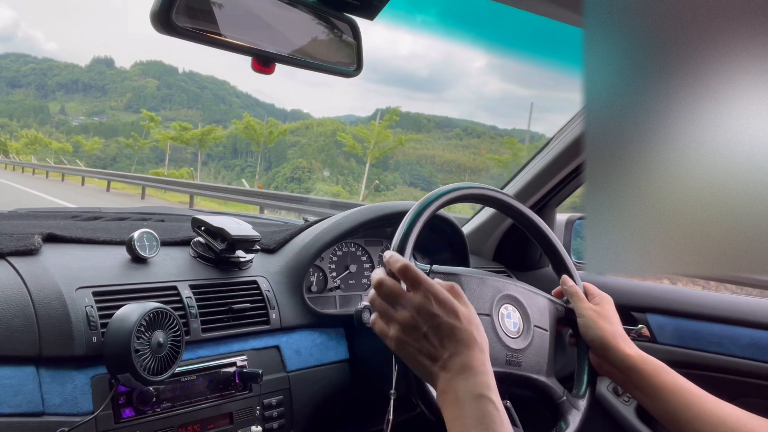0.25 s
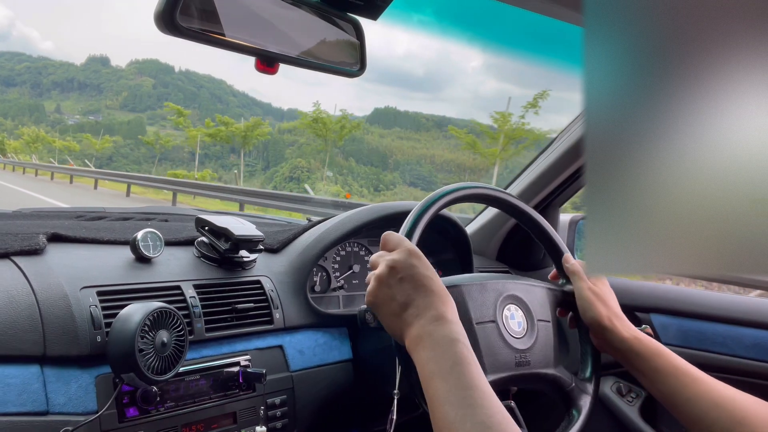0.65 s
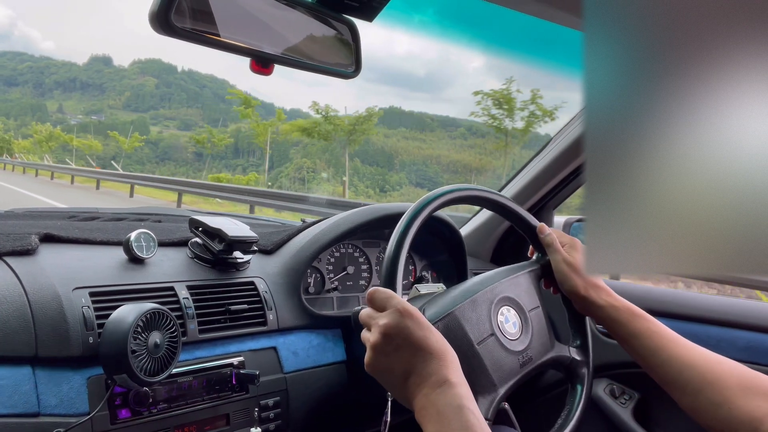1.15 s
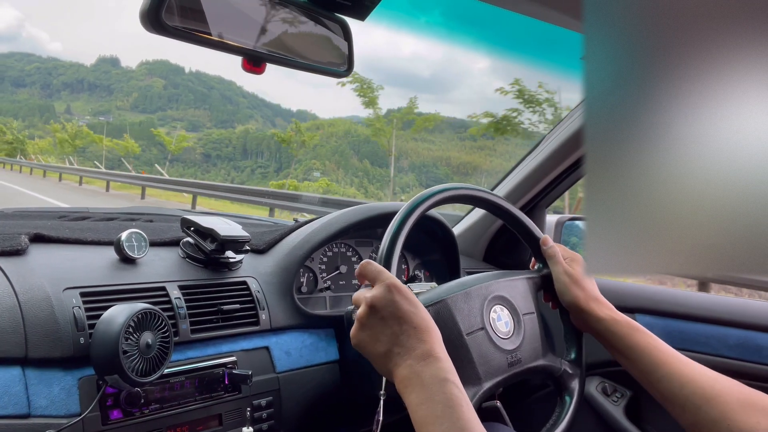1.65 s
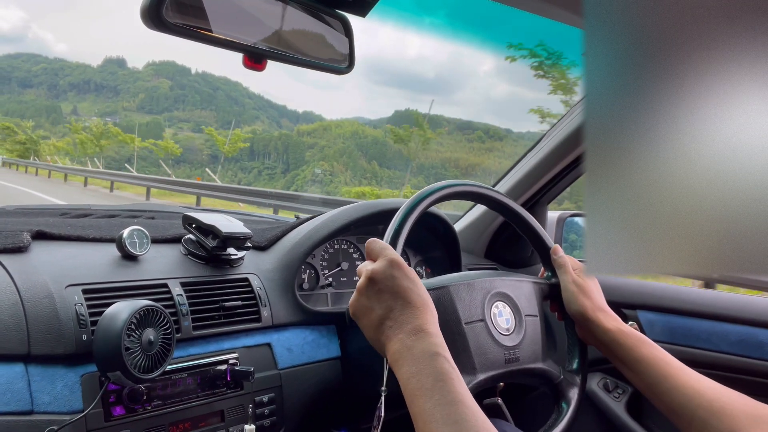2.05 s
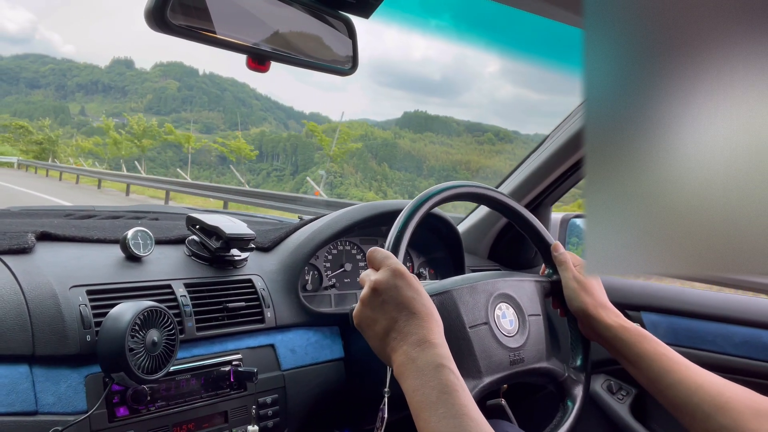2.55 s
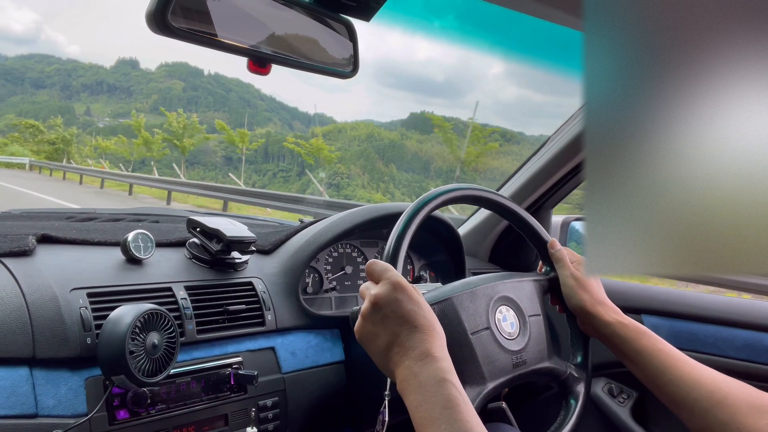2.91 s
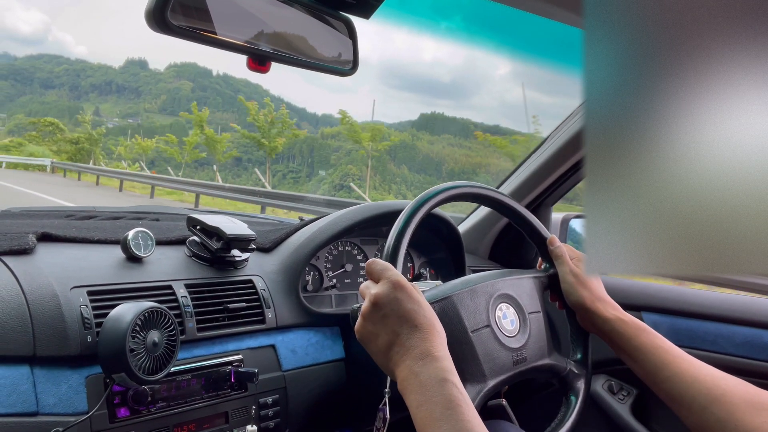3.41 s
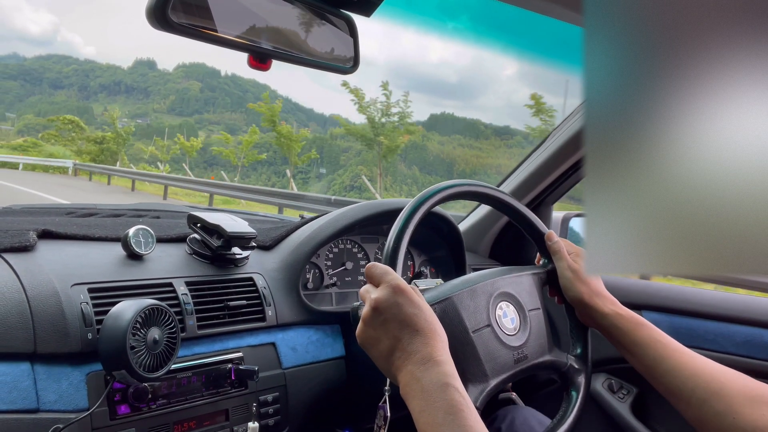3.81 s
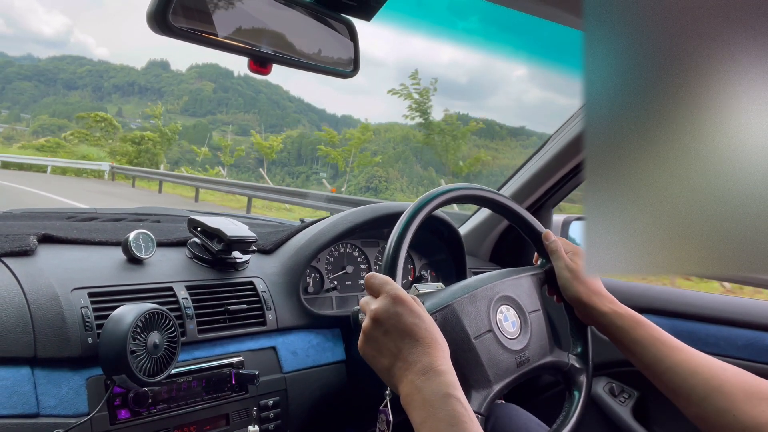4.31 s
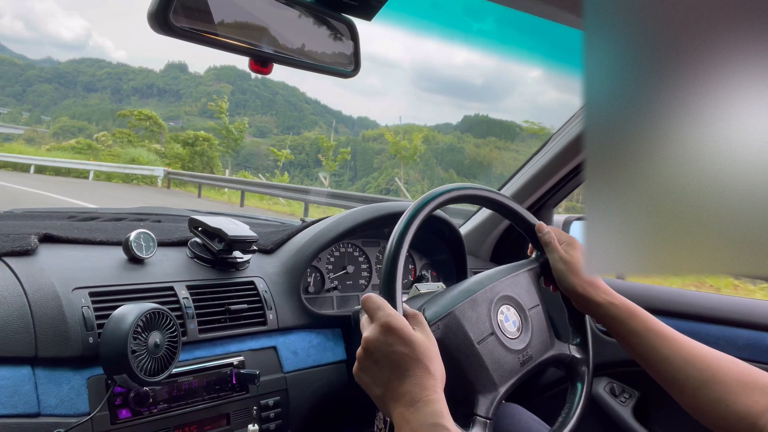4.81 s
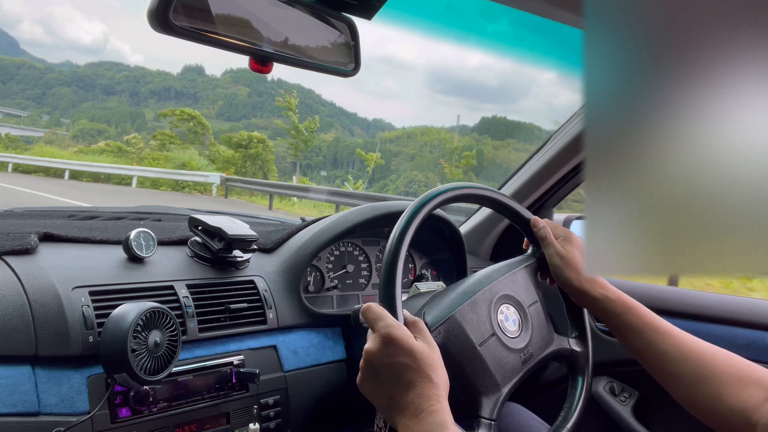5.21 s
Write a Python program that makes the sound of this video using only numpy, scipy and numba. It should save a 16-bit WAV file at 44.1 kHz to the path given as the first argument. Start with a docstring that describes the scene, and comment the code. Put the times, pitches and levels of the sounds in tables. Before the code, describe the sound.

Inside a moving car, a low engine hum rises and eases off over road roar, then wind slams the microphone in harsh, crackling buffets.

```python
"""Wind rushes in at a car window left ajar on a country road and buffets a two-port microphone, clipping its input.
Under it the engine hums up and eases off, the cabin booms and thuds, panels rumble and trim ticks.
Wind is noise low-passed at a corner set by air speed, with swept sine vortices and short overload cracks.
Engine and boom are wavering sines; tyre roar, air hiss, whines and panel rumble are shaped noise."""
import sys
import numpy as np
from scipy import signal
from scipy.fft import rfft, irfft, next_fast_len
from scipy.io import wavfile
from scipy.ndimage import uniform_filter1d
from numba import njit

SR = 44100
rng = np.random.default_rng(int(sys.argv[2]) if len(sys.argv) > 2 else 0)


def transcribe(u):
    """Save the signal u as a 16-bit wav file named by the first command-line argument.

    u: samples, shape (n,) or (channels, n), limited to [-1, 1]; the rate is SR.
    q: integer samples, one column per channel.
    """
    v = np.clip(np.atleast_2d(u).T, -1, 1)
    q = np.round(v * 32767).astype(np.int16)
    wavfile.write(sys.argv[1], SR, q)


N = 240770
T = np.arange(N) / SR
FFT_SIZE = next_fast_len(N)
BIN_HZ = np.maximum(np.arange(FFT_SIZE // 2 + 1) * SR / FFT_SIZE, 1)
SIDES = np.array([[1], [-1]])  # left, right; every pan_db is left minus right, every lead_rad is left ahead


def undb(db):
    """dB to gain."""
    return 10 ** (np.asarray(db) / 20)


def unit(x):
    """Scale to rms 1."""
    return x / np.sqrt(np.mean(x ** 2))


def curves(table):
    """Columns of a time table, interpolated to one value a sample."""
    s, *columns = np.transpose(table)
    return [np.interp(T, s, c) for c in columns]


def along(table, column=1):
    """A column of a frequency table on the transform bins, interpolated in log frequency."""
    table = np.array(table, float)
    return np.interp(np.log(BIN_HZ), np.log(table[:, 0]), table[:, column])


def walk(rate_hz):
    """Random levels held 1 / rate_hz and slewed twice; rms 1."""
    hold = int(SR / rate_hz)
    steps = np.repeat(rng.standard_normal(N // hold + 1), hold)
    return unit(uniform_filter1d(uniform_filter1d(steps, hold), hold)[:N])


def pair(likeness, lead_rad, pan_db=0):
    """Spectra of left and right noise, partly shared; the shared part is turned in phase between the ports."""
    shared, left, right = rfft(rng.standard_normal((3, FFT_SIZE)))
    turned = np.sqrt(likeness) * shared * np.exp(.5j * lead_rad * SIDES)
    both = turned + np.sqrt(1 - likeness) * np.array([left, right])
    return both * undb(pan_db * SIDES / 2)


def ring(hz, width_hz, pan_db, likeness):
    """Noise ringing one resonance; rms 1."""
    response = 1 / (1 + ((BIN_HZ - hz ** 2 / BIN_HZ) / width_hz) ** 2)
    return unit(irfft(pair(likeness, 0, pan_db) * response, FFT_SIZE)[:, :N])


@njit
def lowpass(x, hz, damp):
    """State-variable low-pass whose corner moves every sample."""
    y, band, low = np.empty(len(x)), 0., 0.
    for i in range(len(x)):
        g = np.tan(np.pi * hz[i] / SR)
        v = (band + g * (x[i] - low)) / (1 + g * (g + damp))
        y[i] = low + g * v
        band, low = 2 * v - band, low + 2 * g * v
    return y


# Each row: time in seconds, firing rate in Hz, firing tone in dB, its octave in dB.
ENGINE_CURVE = [(0, 71.2, -13, -24), (.2, 71.85, -12.5, -21.5), (.4, 73.85, -17, -20.5),
                (.6, 75.92, -16.5, -25.5), (.8, 78.04, -14, -26), (1.1, 79.9, -12.5, -25.5),
                (1.24, 79.83, -15.5, -27.5), (1.35, 78.08, -24, -27), (1.55, 74.95, -19, -29.5),
                (1.7, 74.13, -23.5, -35), (2.0, 69.9, -16.5, -34)]
# Weaker orders. Each row: multiple of firing rate, dB relative to the octave at 0 s, gain in dB per second.
ENGINE_ORDERS = [(2.5, -15, 3), (3, -24, 12), (3.5, -23, 5), (4, -23, 2)]
ENGINE_PAN_DB, ENGINE_LEAD_RAD = -3, 0.87


def engine():
    """Firing tone and overtones; combustion varies a little, and the hum is gone once the throttle closes."""
    hz, firing_db, octave_db = curves(ENGINE_CURVE)
    phase = 2 * np.pi * np.cumsum(hz * (1 + 0.0024 * walk(25))) / SR
    tones = [(1, firing_db, ENGINE_LEAD_RAD), (2, octave_db, 0)]
    for multiple, db, gain_db in ENGINE_ORDERS:
        tones.append((multiple, octave_db + db + gain_db * T + 4.4 * walk(9), 0))
    hum = 0
    for multiple, db, lead_rad in tones:
        level = np.sqrt(2) * undb(db + 1.1 * walk(9))
        hum = hum + level * np.sin(multiple * phase + lead_rad * SIDES / 2)
    fade = np.clip((ENGINE_CURVE[-1][0] - T) / 0.02, 0, 1)
    return hum * undb(ENGINE_PAN_DB * SIDES / 2) * fade


# Lowest cabin mode. Each row: time in seconds, frequency in Hz, steady level in dB before boom gain.
BOOM_CURVE = [(0, 53.63, -16), (.35, 53.9, -14.5), (.9, 53.84, -24.5), (1.35, 51.92, -15.5),
              (1.6, 52.98, -17.5), (1.85, 55.6, -23.5), (2.3, 57.32, -14), (3.1, 55.98, -16),
              (3.4, 60.96, -26), (3.9, 56.8, -31), (4.3, 54.25, -27.5), (4.72, 53.34, -15),
              (4.88, 54.8, -22), (5.02, 55.02, -19.5), (5.46, 51, -20)]
# The boom swells and sinks. Each row: time of the top in seconds, top level in dB before boom gain,
# length in seconds.
BOOM_SWELLS = [(0.566, -14.5, 0.15), (0.703, -15.5, 0.11), (0.814, -9.5, 0.037), (1.044, -15, 0.085),
               (1.26, -14, 0.094), (1.967, -17, 0.11), (2.07, -9.5, 0.055), (2.474, -13, 0.18),
               (2.632, -14.5, 0.096), (2.774, -12, 0.17), (2.989, -12.5, 0.15), (4.279, -19, 0.05),
               (4.425, -14.5, 0.16), (4.61, -18.5, 0.2), (5.175, -14, 0.17), (5.346, -14.5, 0.071)]
# Body panels. Each row: time in seconds, rumble level in dB.
PANEL_LEVELS = [(0, -22.5), (.4, -27.5), (1.0, -20.5), (1.7, -23.5), (1.95, -14.5), (2.4, -19.5),
                (2.75, -28), (3.0, -14.5), (3.27, -11), (3.5, -17.5), (3.72, -21), (4.4, -30),
                (4.77, -19.5), (5.0, -28), (5.46, -22.5)]
BOOM_GAIN_DB, BOOM_PAN_DB = 0.4, 4.5
SWELL_GAP_DB, SWELL_GAP_S = -8, 0.015  # the steady boom gives way around a swell


def cabin():
    """Road-shaken cabin air swings on its lowest mode, wavering, with a looser rumble; panels ring higher."""
    hz, steady_db = curves(BOOM_CURVE)
    s, top_db, length_s = np.transpose(BOOM_SWELLS)[:, :, None]
    away = abs(T - s) / (length_s / 2)
    swell = np.sum(undb(top_db) * np.cos(np.pi / 2 * np.clip(away, 0, 1)), axis=0)
    outside_s = (away - 1).clip(0) * length_s / 2
    near = np.max(np.exp(-(outside_s / SWELL_GAP_S) ** 2), axis=0)
    size = swell + undb(steady_db + SWELL_GAP_DB * near + 2.6 * walk(10))
    wavering_hz = hz * (1 + 0.02844 * walk(18) + 0.02983 * walk(4))
    phase = 2 * np.pi * np.cumsum(wavering_hz) / SR + 0.23 * walk(6.8) * SIDES / 2
    boom = np.sqrt(2) * size * undb(BOOM_GAIN_DB + BOOM_PAN_DB * SIDES / 2) * np.sin(phase)
    rumble = size * undb(-5) * ring(hz=34, width_hz=41, pan_db=0.99, likeness=0.91)
    panels = undb(curves(PANEL_LEVELS)[0]) * ring(hz=87.5, width_hz=53.5, pan_db=-2, likeness=0.43)
    return boom + rumble + panels


# Path difference turns the treble phase between the ports.
# Each row: frequency in Hz, likeness 0-1, left lead in radians, left minus right in dB.
PORT_RESPONSE = [(154, 0.02, 1.5, -1.5), (324, 0.42, -0.1, -2), (680, 0.63, 4, -3), (1610, 0.22, 0, -0.3),
                 (2850, 0.05, 0.5, -2), (4700, 0.04, -6, -1), (7850, 0.5, -4, -1), (11000, 0.6, -1, -1),
                 (14100, .9, 2.5, 0), (15800, .8, 4, 3.5)]


def rush(spectrum, in_hz, swell_db, flicker_db):
    """Noise octave bands that swell together and flicker alone; rms 1 within in_hz before both."""
    ports = pair(along(PORT_RESPONSE), along(PORT_RESPONSE, column=2), along(PORT_RESPONSE, column=3))
    noise = undb(along(spectrum)) * ports
    inside = (BIN_HZ > in_hz[0]) & (BIN_HZ < in_hz[1])
    noise /= np.sqrt(2 * np.mean(np.sum(abs(noise[:, inside]) ** 2, axis=1))) / FFT_SIZE
    out = 0
    for octave in np.arange(np.log2(spectrum[0][0]), np.log2(spectrum[-1][0]) + 1):
        band = np.clip(1 - abs(np.log2(BIN_HZ) - octave), 0, 1)
        out = out + undb(flicker_db * walk(24)) * irfft(band * noise, FFT_SIZE)[:, :N]
    return undb(swell_db * walk(5.05)) * out


# Each row: time in seconds, tyre roar in dB within 1.5-3 kHz, air hiss in dB within 6-12 kHz.
ROAD_LEVELS = [(0, -51.5, -61), (.5, -50.5, -58.5), (1.0, -49.5, -57.5), (1.5, -50, -59),
               (1.9, -49.5, -60.5), (2.2, -48.5, -65), (3.3, -49, -62), (4.0, -50, -63.5),
               (4.5, -50.5, -65.5), (5.0, -49.5, -68), (5.46, -51, -70)]
# Each row: frequency in Hz, relative density in dB per Hz.
TYRE_SPECTRUM = [(80, -36.5), (130, 0.5), (250, -7.5), (400, -14.5), (520, -19), (640, -13), (800, -21),
                 (1000, -21.5), (1130, -25), (1280, -33), (1500, -31.5), (1900, -32), (2600, -36.5),
                 (3000, -43.5), (3500, -49), (4800, -50), (7000, -84.5)]


def tyres():
    """Tyre roar: broad noise weighted to the low end."""
    tyre_db, _ = curves(ROAD_LEVELS)
    return undb(tyre_db) * rush(TYRE_SPECTRUM, (1500, 3000), swell_db=.7, flicker_db=.8)


# Each row: frequency in Hz, relative density in dB per Hz.
HISS_SPECTRUM = [(2500, -3.5), (3500, 3), (4200, -1), (5000, -4), (6800, -4), (8400, -7), (10200, -1.5),
                 (12000, -10.5), (13800, -15), (15300, -9), (16500, -17)]


def hiss():
    """Air hissing past: treble noise."""
    _, hiss_db = curves(ROAD_LEVELS)
    return undb(hiss_db) * rush(HISS_SPECTRUM, (6000, 12000), swell_db=1.1, flicker_db=.8)


# Dashboard resonances. Each row: frequency in Hz, width in Hz, left minus right in dB.
WHINE_MODES = [(3472, 28, -5), (1815, 24, 0)]
# Each row: time in seconds, first whine in dB, second whine in dB.
WHINE_CURVE = [(0, -70, -68), (.2, -68, -68), (.45, -62.5, -66), (.56, -71, -68), (.8, -65, -57.5),
               (.95, -69, -60), (1.1, -66, -61), (1.25, -66, -56.5), (1.45, -71, -64), (1.7, -66, -62),
               (1.9, -72, -66), (2.1, -90, -90)]


def whines():
    """Faint, narrow, unsteady dashboard tones: noise ringing resonances."""
    out = 0
    for (hz, width_hz, pan_db), db in zip(WHINE_MODES, curves(WHINE_CURVE)):
        out = out + undb(db) * ring(hz, width_hz, pan_db, likeness=0.56)
    return out


WIND_LIKENESS, WIND_LEAD_RAD = 0.79, 1.886


def eddies(hz):
    """Turbulent pressure: strong up to a corner set by the air speed, falling steeply above."""
    highpass = BIN_HZ ** 2 / (BIN_HZ ** 2 + 60 ** 2)
    raw = irfft(pair(WIND_LIKENESS, WIND_LEAD_RAD) * highpass, FFT_SIZE)[:, :N]
    dark = np.array([lowpass(lowpass(side, hz, 1.134), 1.235 * hz, 1.23) for side in raw])
    return dark * np.sqrt(SR / 2 / hz)  # holds the level as the corner moves


# Stream over the ports. Each row: time in seconds, level in dB, air speed as a share of the usual.
GUST_CURVE = [(0, -31, 1.03), (.6, -26, 1.09), (1.2, -24.5, 0.95), (1.895, -26, 1.125), (1.94, -13, 0.91),
              (2.0, -23, 0.95), (2.13, -18.5, 0.8), (2.25, -23, 0.9), (3.06, -24.5, 1.05),
              (3.1, -11.5, 0.93), (3.3, -12, 0.91), (3.4, -27, 1.4), (3.7, -34.5, 0.94),
              (4.28, -34.5, 1.21), (4.35, -56, 1.05), (4.68, -28.5, 1.15), (4.74, -23.5, 1.04),
              (5.03, -29, 1.42), (5.1, -16, 0.81), (5.2, -18.5, 0.76), (5.33, -20, 0.74), (5.46, -19, 0.8)]
# Each row: start in seconds, drive in dB before onset and buffet gain, air speed as a share of the usual
# before slowing, decay t60 in seconds.
BUFFET_HITS = [(1.908, -8, 0.6, 0.1), (1.941, -6.5, 0.86, 0.043), (2.059, -28, 1.1, 0.17),
               (2.099, -12.5, 0.73, 0.045), (2.141, -10.5, 0.68, 0.075), (2.439, -27, 0.68, 0.078),
               (2.506, -35, 1.6, 0.058), (2.881, -19, 0.64, 0.082), (3.088, -2, 0.84, 0.07),
               (3.1, -3.5, 1.03, 0.035), (3.115, -4, 0.99, 0.05), (3.135, -0.5, 1.23, 0.031),
               (3.171, -2.5, 1.31, 0.041), (3.19, -3.5, 0.96, 0.042), (3.22, -14, 0.89, 0.064),
               (3.247, -7, 1.23, 0.12), (3.263, -5, 1.47, 0.18), (3.315, -4.5, 0.96, 0.08),
               (3.348, -8, 0.7, 0.07), (3.386, -5, 0.81, 0.05), (3.422, -11, 1.05, 0.082),
               (3.439, -9, 1.28, 0.064), (3.462, -17, 1.3, 0.068), (3.509, -10, 1.38, 0.072),
               (3.534, -6.5, 1.33, 0.044), (3.57, -23, 1.1, 0.091), (3.589, -16, 1.2, 0.14),
               (3.629, -13.5, 1.46, 0.086), (3.677, -16.5, 1.42, 0.086), (3.725, -30, 1.3, 0.068),
               (3.775, -19, 1.18, 0.13), (3.785, -13.5, 1.06, 0.056), (3.882, -3.5, 1.4, 0.034),
               (3.915, -14, 0.87, 0.087), (3.935, -8.5, 1.05, 0.036), (3.961, -8.5, 1.36, 0.053),
               (3.976, -0.5, 0.74, 0.026), (4.027, -20, 1.37, 0.094), (4.064, -12, 1.28, 0.064),
               (4.136, -15.5, 0.62, 0.087), (4.166, -22, 1.2, 0.044), (4.236, -18, 1.06, 0.11),
               (4.259, -19, 1.02, 0.11), (4.666, -20.5, 1.03, 0.06), (4.721, -17, 0.89, 0.086),
               (4.784, -28, 1.1, 0.057), (4.92, -25, 1.3, 0.065), (5.055, -10, 0.66, 0.056),
               (5.12, -11.5, 0.41, 0.067), (5.178, -19.5, 0.5, 0.067), (5.235, -22, 0.49, 0.063)]
STREAM_HZ, BUFFET_HZ = 310, 599  # eddy corners at speed share 1
BUFFET_GAIN_DB = 0.27


def wind():
    """A ragged stream of air, and buffets that strike the ports: the faster the air, the brighter."""
    db, speed = curves(GUST_CURVE)
    stream = undb(db + 2.5 * walk(40) + 1.2 * walk(12)) * eddies(STREAM_HZ * speed)
    power, speed_power, age = np.full(N, 1e-12), np.full(N, 1e-12), T[:SR // 4]
    onset = (1 - np.exp(-age / 0.0035)) ** 1.16
    slowing = 0.7 + 0.4 * np.exp(-age / 0.0067)  # the eddy slows, so its noise darkens
    for s, drive_db, speed, t60_s in BUFFET_HITS:
        blow = undb(drive_db - 60 * (age / t60_s) ** 1.335) * onset
        start = int(s * SR)
        size = min(len(age), N - start)
        power[start:start + size] += blow[:size] ** 2
        speed_power[start:start + size] += (blow ** 2 * speed * slowing)[:size]
    gusty = eddies(BUFFET_HZ * speed_power / power)
    # eddy noise evened out over 400 samples, so a buffet fills its span
    gusty /= (uniform_filter1d(np.mean(gusty ** 2, axis=0), size=400) + 0.05) ** 0.34
    return stream + undb(BUFFET_GAIN_DB) * np.sqrt(power) * gusty


# Each row: start in seconds, level in dB, mid-sweep frequency in Hz, left minus right in dB (held to +-8).
VORTEX_HITS = [(1.906, -15, 398.2, -5), (1.94, -11.5, 587, -3), (2.099, -14, 480, 0.5),
               (2.142, -14.5, 482, -2.5), (2.88, -15, 480.5, -4), (3.09, -11, 601, -1),
               (3.101, -6, 520, -1), (3.116, -10, 700, 3), (3.121, -11.5, 890, -3), (3.137, -8, 704, -6),
               (3.172, -8.5, 640, -6), (3.192, -9.5, 594, -2), (3.219, -11, 550, -3), (3.247, -8, 550, -4),
               (3.267, -4.5, 996, -0.5), (3.273, -11, 696, -2), (3.28, -7.5, 750, 1), (3.285, -11, 850, 1),
               (3.295, -12, 800, 0), (3.316, -6.5, 700, -2), (3.327, -6, 496, -5), (3.384, -9, 430, -3),
               (3.423, -14, 796, -2), (3.442, -17, 1250, 1), (3.449, -12, 500, 0), (3.463, -15, 750, -4),
               (3.509, -20, 1150, 0), (3.513, -11, 600, -3), (3.536, -11.5, 980, 0), (3.543, -22, 1390, -3),
               (3.546, -10, 440, 1), (3.597, -21, 800, -7), (3.633, -12, 950, -9), (3.679, -17, 600, -2),
               (3.776, -22, 600, -2), (3.787, -17, 700, 4), (3.884, -14, 1300, 0), (3.886, -11, 750, -1),
               (3.914, -17, 480, -2), (3.935, -15, 561, -1), (3.96, -16, 1260, -1), (3.964, -15, 900, 0),
               (3.968, -10, 596, 2), (3.978, -11, 380, 2), (4.028, -19, 850, -6), (4.065, -18.5, 1010, 0),
               (4.077, -18, 608, 8), (4.168, -17, 556, -3), (4.236, -14.5, 477, 3), (4.258, -20, 700, -4),
               (4.92, -21, 509, -8), (5.054, -11.5, 406, 0.5), (5.118, -13.5, 371.3, -7)]
VORTEX_CYCLES, VORTEX_FALL_OCTAVES = 3, 1.2  # length in mid-sweep cycles, pitch drop
VORTEX_OVERTONE, VORTEX_LEAD_RAD = 0.17, 1.86  # overtone share at the start


def vortices():
    """Each vortex snaps past the ports: a few steep pressure swings that slow down as it passes."""
    out = np.zeros((2, N))
    start_rad = rng.uniform(0, 2 * np.pi, (len(VORTEX_HITS), 1))
    for (s, db, hz, pan_db), turn in zip(VORTEX_HITS, start_rad):
        share = np.arange(int(VORTEX_CYCLES / hz * SR)) * hz / VORTEX_CYCLES / SR
        falling_hz = hz * 2 ** (VORTEX_FALL_OCTAVES * (.5 - share))
        phase = turn + 2 * np.pi * np.cumsum(falling_hz) / SR + VORTEX_LEAD_RAD * SIDES / 2
        swing = np.sin(phase) + VORTEX_OVERTONE * (1 - share) * np.sin(2 * phase)
        level = undb(db + np.clip(pan_db, -8, 8) * SIDES / 2)
        i = int(s * SR)
        out[:, i:i + len(share)] += level * np.sin(np.pi * share) ** 2 * swing
    return out


# Each row: time of the top in seconds, rms level at the top in dB, length in seconds, frequency in Hz.
BODY_THUDS = [(1.921, -11, 0.047, 90), (1.935, -16, .04, 280), (2.597, -21, 0.058, 85),
              (3.143, -8.5, 0.069, 72), (3.257, -7.5, 0.052, 95), (3.335, -7, 0.055, 70),
              (3.392, -8.5, 0.033, 110), (3.453, -16, .016, 240), (3.551, -14, .014, 200),
              (3.638, -11.5, 0.047, 80), (3.924, -18.5, 0.094, 75), (4.095, -19.5, 0.15, 76),
              (4.269, -14.5, 0.064, 76), (5.186, -15, 0.036, 121.4), (5.245, -18, 0.049, 151)]
THUD_LEAD_RAD, THUD_PAN_DB = 1, -3


def thuds():
    """Each thud is a few swings of the body that rise and sink."""
    s, top_db, length_s, hz = np.transpose(BODY_THUDS)[:, :, None]
    start_rad = rng.uniform(0, 2 * np.pi, (len(BODY_THUDS), 1))
    shape = np.cos(np.pi * np.clip((T - s) / length_s, -.5, .5))
    swing = np.sum(undb(top_db) * shape * np.exp(1j * (2 * np.pi * hz * T + start_rad)), axis=0)
    sides = np.imag(swing * np.exp(.5j * THUD_LEAD_RAD * SIDES))
    return np.sqrt(2) * undb(THUD_PAN_DB * SIDES / 2) * sides


# Each row: start in seconds, size of the jump in dB, left minus right in dB.
OVERLOAD_CRACKS = [(1.941, -21, -1), (3.092, -16.5, -3), (3.102, -21, 0), (3.1235, -10, 2),
                   (3.138, -17, -6), (3.142, -14, -6), (3.174, -17.5, -10), (3.179, -19, 0),
                   (3.1893, -20, -2), (3.195, -14, 0), (3.251, -16, -6), (3.261, -13, -3), (3.268, -7, 3.5),
                   (3.279, -21, -2.5), (3.286, -20, 2), (3.319, -14.5, 3), (3.329, -20, -2),
                   (3.387, -23, -2.5), (3.633, -26, -5), (3.886, -27, 0), (3.963, -30, 1)]
CRACK_RISE_S, CRACK_FALL_S = .00025, .0008


def cracks():
    """Sharp cracks of the overloaded input: a short jump up or down that slides back."""
    out, age = np.zeros((2, N)), T[:300]
    jump = (1 - np.exp(-age / CRACK_RISE_S)) * np.exp(-age / CRACK_FALL_S)
    signs = np.sign(rng.standard_normal((len(OVERLOAD_CRACKS), 1)))
    for (s, db, pan_db), sign in zip(OVERLOAD_CRACKS, signs):
        i = int(s * SR)
        out[:, i:i + len(age)] += sign * undb(db + pan_db * SIDES / 2) * jump / jump.max()
    return out


# Each row: start in seconds, nominal peak in dB, left minus right in dB.
TRIM_TICKS = [(3.779, -43, 3), (4.348, -43.5, 1), (4.474, -53, 0), (4.541, -46, -2), (4.556, -48, -2),
              (4.72, -48.5, 1), (4.9198, -54, -4)]
# Each row: frequency in Hz, relative level in dB, decay t60 in seconds.
TRIM_MODES = [(3490, 2, 0.011), (4570, 4.5, 0.0052), (6178, 5.5, 0.0019), (8150, -9, 0.0051),
              (11100, -4.5, .005)]
TICK_RMS_DB = -11.5  # rms relative to nominal peak


def trim():
    """Plastic trim ticks: a short rattle that rings a few modes."""
    out, age = np.zeros((2, N)), T[:1000]
    modes = sum(undb(db - 60 * age / t60_s) * np.sin(2 * np.pi * hz * age) for hz, db, t60_s in TRIM_MODES)
    for s, peak_db, pan_db in TRIM_TICKS:
        shape = age * np.exp(-age / 0.0066)
        rattle = rng.standard_normal((2, len(age))) * shape * undb(3 * walk(600)[:len(age)])
        tick = unit(signal.fftconvolve(rattle, modes[None], axes=1))
        i = int(s * SR)
        out[:, i:i + tick.shape[1]] += undb(peak_db + TICK_RMS_DB + pan_db * SIDES / 2) * tick
    return out


def scene():
    """All sources summed at the two ports."""
    steady = engine() + cabin() + tyres() + hiss() + whines()
    return steady + wind() + vortices() + thuds() + cracks() + trim()


MIC_LOW_HZ, TOP_HZ = 33, 15800


def record(dry):
    """The microphone thins the deepest bass, the input clips at full scale, the top is cut."""
    thin_bass = signal.butter(3, MIC_LOW_HZ, "high", fs=SR, output="sos")
    cut_top = signal.ellip(12, .02, 70, TOP_HZ, fs=SR, output="sos")
    heard = signal.sosfilt(thin_bass, dry)
    return signal.sosfilt(cut_top, np.clip(heard, -1, 1))


dry = scene()
out = record(dry)
transcribe(out)
```